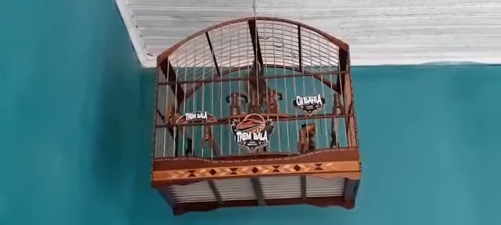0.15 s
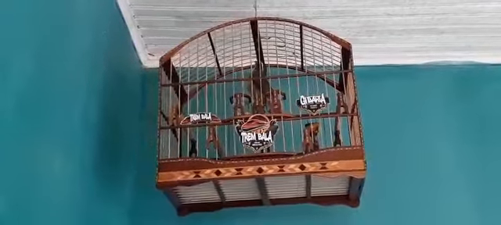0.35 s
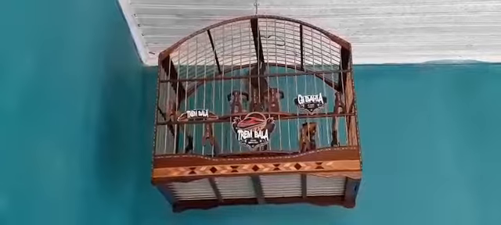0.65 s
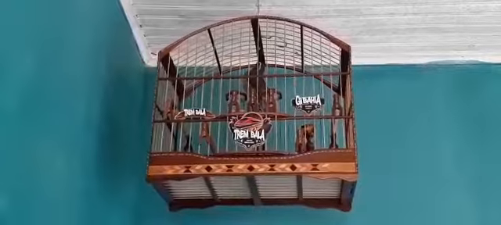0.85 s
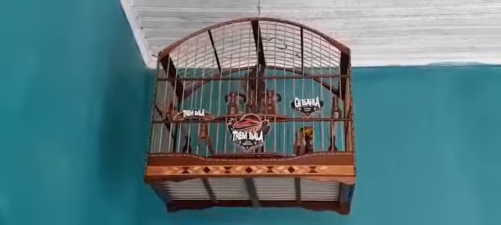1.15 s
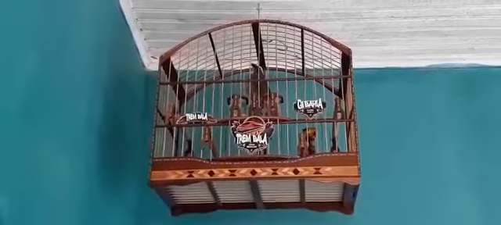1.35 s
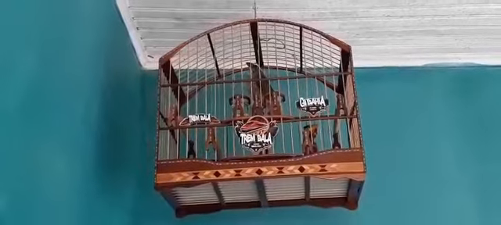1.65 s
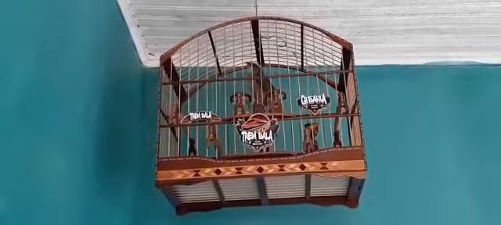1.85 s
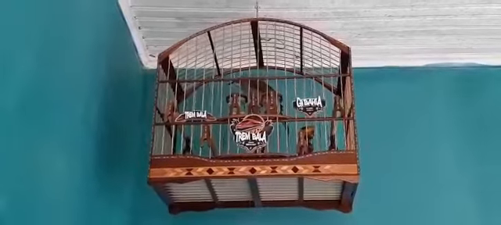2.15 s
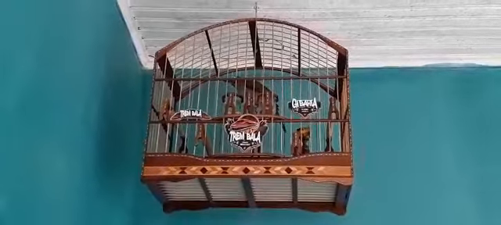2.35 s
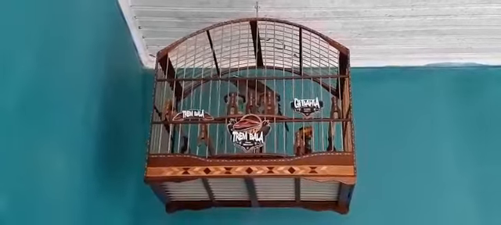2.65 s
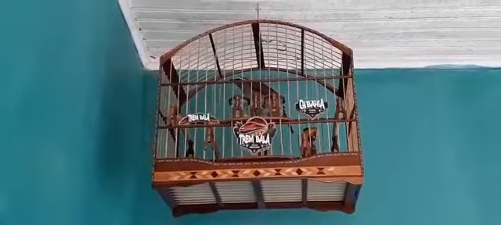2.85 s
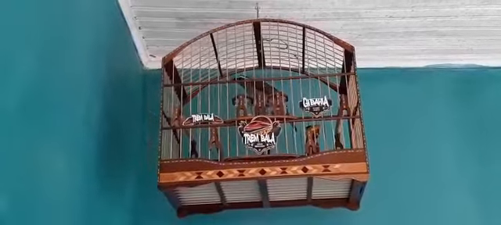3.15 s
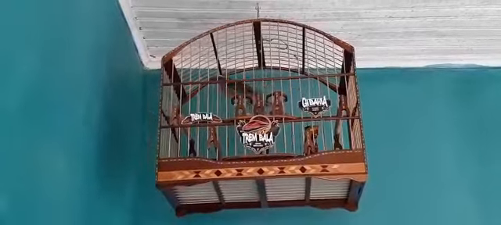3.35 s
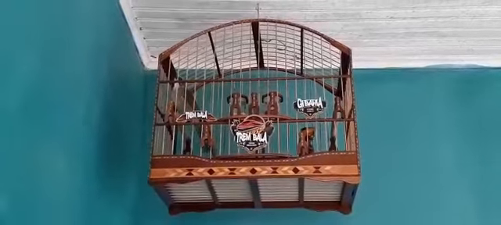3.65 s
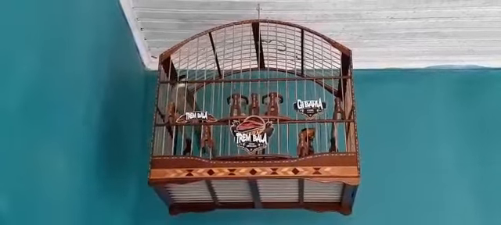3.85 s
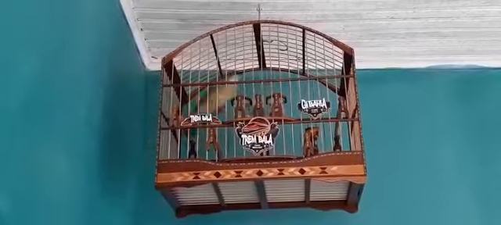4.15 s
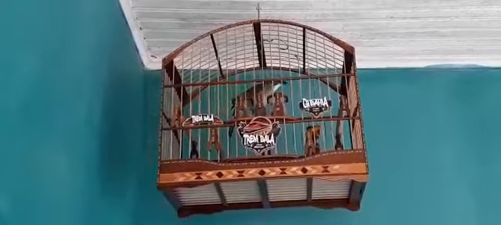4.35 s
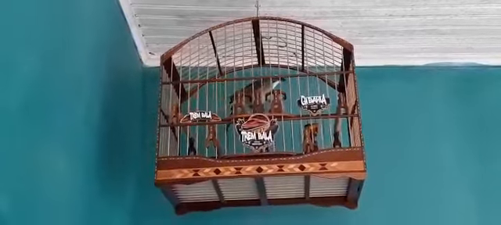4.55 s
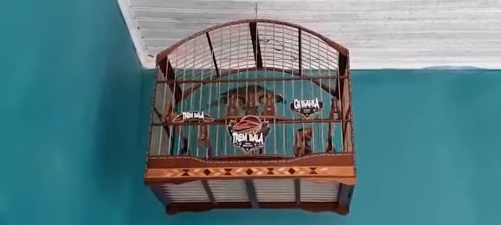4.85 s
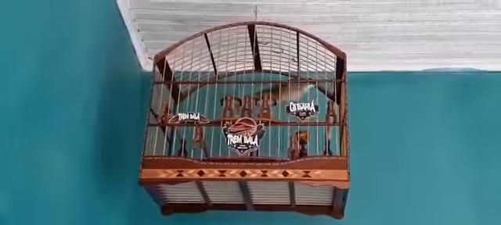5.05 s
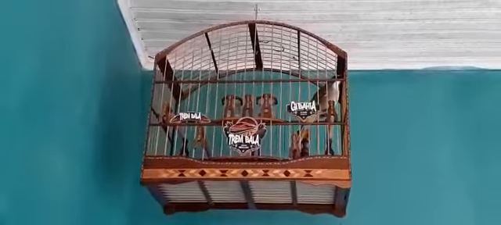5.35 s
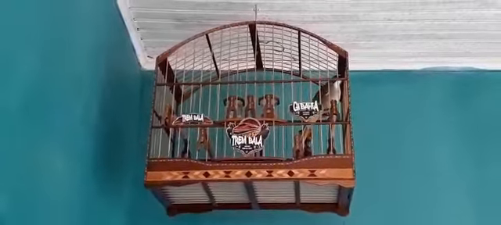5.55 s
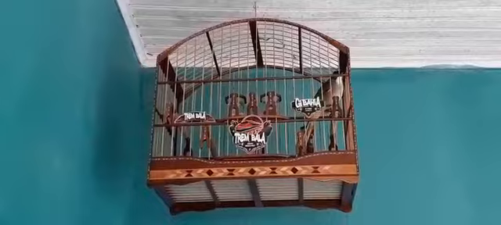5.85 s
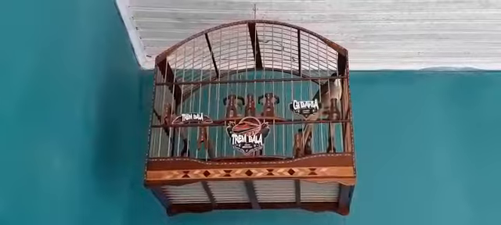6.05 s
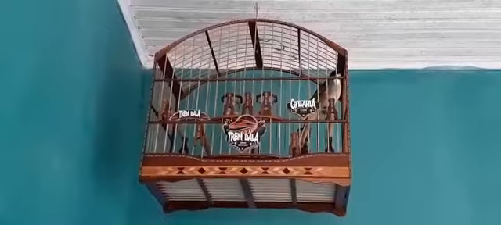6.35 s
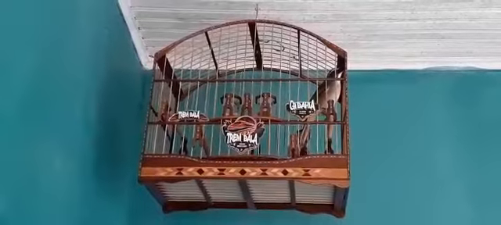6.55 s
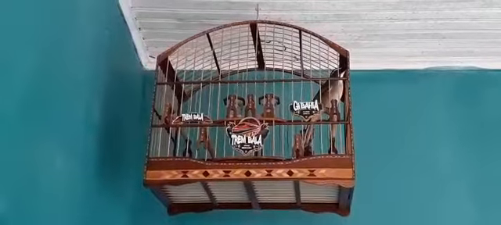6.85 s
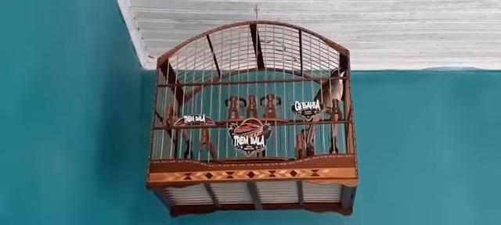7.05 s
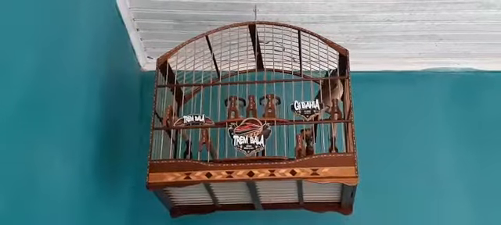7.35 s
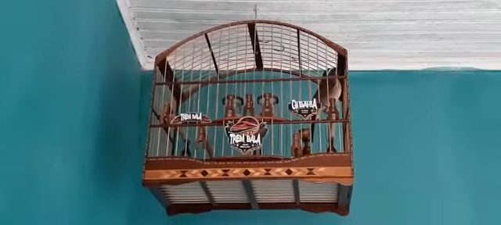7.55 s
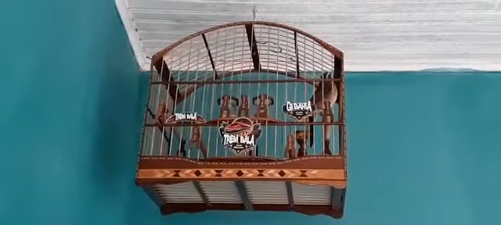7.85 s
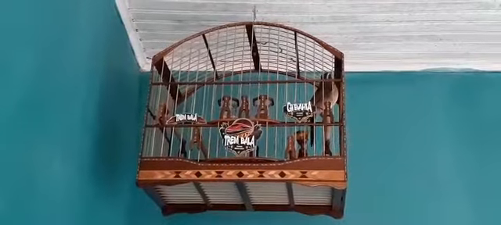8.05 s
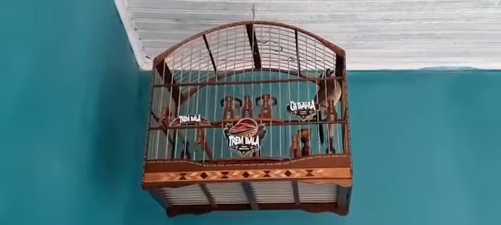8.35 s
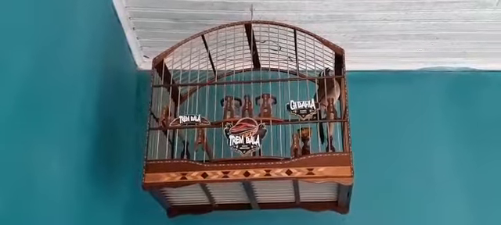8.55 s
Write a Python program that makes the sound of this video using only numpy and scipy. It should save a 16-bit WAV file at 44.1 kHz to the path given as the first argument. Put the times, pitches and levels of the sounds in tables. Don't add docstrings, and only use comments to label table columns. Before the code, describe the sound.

Stereo pickup close to a caged songbird indoors, with a bright echoing tail. Its pure whistled phrase fills the first second; afterwards faint chirps, squeaks, dove coos and vehicle rumble drift in from outside, with a distant buzzy call and dry perch ticks. Around five seconds another bird replies from farther away, blurred by reflections. A very faint horn follows, then the near bird resumes with a buzz and whistles.

```python
import sys
import numpy as np
from scipy import signal
from scipy.io import wavfile
from scipy.ndimage import uniform_filter1d, minimum_filter1d

SR = 44100
rng = np.random.default_rng(int(sys.argv[2]) if len(sys.argv) > 2 else 0)


def gain_from_decibels(decibels):
    exponent = np.asarray(decibels, float) / 20
    return 10 ** exponent


def bounce(signal):
    frames = np.transpose(np.atleast_2d(signal))
    limited = np.clip(frames, -1, 1)
    pcm = np.round(limited * 32767).astype(np.int16)
    wavfile.write(sys.argv[1], SR, pcm)


N = 383669
BEFORE = SR // 4

# (frequency [Hz], density [dB/Hz])
STILL = [(32, -40), (46, -12), (62, -1.5), (93, -5), (130, -8), (200, -14.5), (360, -12), (700, -20.5),
         (1000, -30), (2500, -39), (6000, -33), (8000, -53.5), (12000, -52.5), (16000, -55.5)]
# (frequency [Hz], density [dB/Hz])
ROAD = [(32, -38.5), (48, -12), (86, 1), (208, -18.5), (251, -8.5), (500, -14.5), (977, -15.5),
        (1410, -15.5), (2910, -25.5), (4500, -21.5), (8000, -40), (16000, -57)]
# (frequency [Hz], level [dB])
CHORUS = [(2800, -16), (3600, -2.5), (4500, -0.8), (5600, 0), (6400, -8.5), (7500, -18.5), (10000, -29),
          (13000, -27.5), (16000, -29.5)]
# (frequency [Hz], width [Hz], level [dB])
HUM = [
    (56, 36, -16),
    (89, 56, 1),
]
# (closest [s], half passing time [s], level [dB])
PASSES = [
    (.3, .5, -64),
    (1.8, 0.44, -69.5),
    (2.95, .4, -52),
    (3.55, .4, -52.5),
    (4.4, 0.911, -53),
    (6.4, 0.31, -62.5),
    (8., 0.34, -68),
]
# (centre [s], half length [s], level [dB])
BOUTS = [
    (.3, 0.29, -58.5),
    (1.196, 0.2, -51),
    (2.002, 0.8, -52.5),
    (2.848, 0.5, -47.5),
    (3.502, 0.17, -53),
    (4.017, 0.11, -51),
    (5.252, 0.23, -50),
    (6.18, 0.39, -50),
    (7.426, 0.1, -54.5),
    (8.201, 0.23, -59.5),
]
# (centre [s], half length [s], level [dB])
THROBS = [
    (0.945, .2, -55),
    (2.314, 0.28, -50),
    (2.923, .15, -46.5),
    (3.2, 0.038, -39.5),
    (3.791, 0.065, -41),
    (4.048, 0.055, -46),
    (4.465, 0.2, -44.5),
    (5.302, 0.55, -45.5),
    (6.702, 0.32, -47),
    (7.952, 0.44, -48),
]
STILL_DB, FAR_ROAD_DB, FAR_FLOCK_DB, IDLE_DB = -55, -72.5, -73, -59.5
# (frequency [Hz], correlation [-])
SAME = [(60, 1), (130, .93), (250, .9), (500, 0.51), (1500, 0.58), (4000, 0.28), (10000, 0.4)]
# (frequency [Hz], left minus right [dB])
LEAN = [(60, 7), (130, 9), (290, 2), (620, 5), (1400, 1), (3000, -0.5), (6000, 0.5), (12000, 0.5)]
# (frequency [Hz], phase [rad])
LEAD = [(40, 0.33), (130, 0.89), (300, -0.75), (600, -1.4), (1200, -0.15)]
PORT_LAG_S = 18 / SR

# (time [s], length [s], centre [Hz], level [dB])
CHIRPS = [(0.473, 0.071, 5200, -62), (1.385, 0.039, 3325, -54), (1.646, 0.073, 5199, -48.5),
          (1.854, 0.1, 4952, -52.5), (1.998, 0.0955, 5615, -53), (2.365, 0.17, 5700, -50),
          (2.446, 0.0932, 4900, -53), (3.411, 0.233, 5250, -49), (3.694, 0.0694, 4771, -51),
          (3.948, 0.135, 5132, -49), (4.394, .064, 4537, -54), (5.22, 0.1868, 5347, -48.5),
          (5.97, 0.108, 5684, -45.5), (6.537, 0.06, 3500, -52.5), (6.559, .1, 5210, -56.5),
          (7.1, 0.11, 4410, -63.5), (7.773, 0.075, 3820, -58.5)]
# (time [s], length [s], centre [Hz], level [dB])
SQUEAKS = [
    (0.956, 0.123, 4200, -70.5),
    (1.341, 0.155, 4210, -56.5),
    (3.585, 0.132, 7600, -47.5),
    (5.971, 0.0986, 3800, -41.5),
    (6.618, 0.116, 3100, -61.5),
    (6.95, 0.115, 7070, -57.5),
    (7.351, 0.3, 4170, -65),
    (8.095, .2, 4000, -65.5),
    (8.401, 0.16, 3900, -64),
]
# (time [s], length [s], pitch [Hz], level [dB])
PEEPS = [(1.108, 0.1827, 5900, -60.5), (1.552, 0.048, 6094, -49.5), (1.826, 0.0407, 6180, -52),
         (2.129, 0.18, 8135, -61), (2.363, 0.056, 6388, -54.5), (2.801, 0.0584, 5120, -59),
         (3.696, 0.04, 5870, -53), (3.92, 0.0592, 6164, -48), (4.322, 0.049, 8237, -54),
         (5.255, 0.089, 6050, -52.5), (4.325, 0.049, 8820, -60), (4.59, 0.084, 5893, -50.5),
         (4.934, 0.057, 5882, -50), (5.798, 0.056, 8194, -52.5), (7.343, .17, 4940, -69),
         (6.599, .09, 4200, -55.5)]
# (time [s], length [s], start [Hz], end [Hz], level [dB])
GLIDES = [
    (4.457, 0.062, 5539, 5830, -45.5),
    (4.551, 0.0587, 4440, 3937, -43.5),
    (4.578, 0.044, 3919, 3109, -48),
    (4.625, 0.165, 3262, 2850, -54.5),
    (5.212, 0.07, 4240, 6354, -48),
    (5.968, 0.04, 4400, 6586, -47.5),
]
# (time [s], length [s], start [Hz], end [Hz], level [dB])
DIPS = [
    (0, 0.06, 6680, 5560, -50.5),
    (0.067, 0.103, 5615, 5170, -51.5),
    (3.08, 0.0776, 5983, 5935, -52.5),
    (6.098, 0.086, 6847, 5774, -49.5),
    (6.176, .07, 5820, 5262, -44),
    (6.239, 0.1384, 5330, 6059, -48),
]
# (time [s], length [s], pitch [Hz], level [dB], waver [Hz])
COOS = [
    (0.271, 0.13, 1017, -64, 28.8),
    (1.264, 0.1564, 984, -59, 35),
    (1.45, 0.254, 492, -59.5, 31),
    (2.753, 0.116, 964, -61.5, 30.6),
    (3.583, 0.1, 274.7, -61, 8.1),
    (4.218, 0.243, 257, -59.5, 9.5),
    (4.45, 0.32, 273, -55.5, 13.9),
    (6.122, 0.097, 720, -63, 20),
    (7.972, 0.275, 664, -67, 15.8),
    (7.45, 0.067, 534, -62.5, 25.6),
]
# (time [s], length [s], pitch [Hz], level [dB], lowest multiple [-], highest multiple [-])
HORN = [
    (6.78, .3, 436, -69, 6, 8),
    (7.32, .14, 586, -76, 3, 4),
]
HORN_DB = 0.5
# (time [s], length [s], from [Hz], to [Hz], level [dB])
ANSWERS = [
    (2.875, .24, 3260, 2292, -53.5),
    (3.366, .2, 2803, 2400, -43),
    (3.805, .24, 2220, 1957, -46.5),
    (4.18, .19, 2976, 2034, -43.5),
]
# (share of length [-], share of glide [-], level [dB], overtones [dB])
ANSWER = [(0, 0.052, -9.5, -40), (.25, .12, -3.5, -39), (.5, .42, -3, -34.5), (.8, .82, -2.5, -36.5),
          (1, 0.988, -2.5, -40)]
GLIDE_WARBLE, DIP_WARBLE, PEEP_WARBLE, CHIRP_WARBLE = .035, .0091, .012, .083
SQUEAK_WARBLE_HZ, PEEP_SAG = 200, .008

# (time [s], peak [dB])
TICKS = [
    (3.559, -44),
    (4.2253, -34.5),
]

# (time [s], length [s], from [Hz], to [Hz], level [dB])
OTHER_LEAD_IN = [
    (5.045, 0.088, 2355, 2203, -30.5),
]
OTHER_BUZZES = [
    (5.072, .245, 2890, 1967, -24),
]
OTHER_FALLS = [
    (5.466, .235, 3684, 2025, -20.5),
    (5.797, .23, 3677, 2005, -21.5),
]
OTHER_RISES = [
    (6.122, .478, 1209, 2365, -32),
]
# (share of length [-], share of glide [-], level [dB], overtones [dB])
LEAD_IN = [(0, 0.107, -21.5, -50), (.45, 0.95, -13, -50), (1, 0.085, 3, -42.5)]
FAR_BUZZ = [(0, 0, -30, -41.5), (.16, .14, -3.5, -37.5), (.33, .4, 0, -32.5), (.7, .74, -5, -31.5),
            (.85, .88, -9.5, -33.5), (1, 0.94, -12, -38.5)]
FAR_FALL = [(0, 0.015, -13, -34), (.15, .18, 1, -28), (.35, .45, -2.5, -23), (.68, .76, -3.5, -32.5),
            (1, 0.991, -16.5, -28)]
FAR_RISE_PATH = [(0, 0), (.1, .17), (.26, .36), (.47, .57), (.68, .78), (.9, .96), (1, 1)]
# (share of length [-], level [dB], overtones [dB])
FAR_RISE = [(0, -28, -36.5), (.12, -20, -33.5), (.26, -10, -33.5), (.47, -3.5, -25.5), (.66, -0.5, -28.5),
            (.93, -8.5, -30.5), (1.001, -24, -24.5)]
DULL_DB = -4

# (time [s], length [s], from [Hz], to [Hz], level [dB])
NEAR_HIGH = [
    (-.2, .2, 2480, 2855, -20),
    (8.216, .2, 2480, 2855, -17.5),
]
NEAR_LOW = [
    (.14, .155, 1420, 2090, -23.5),
    (8.544, .155, 1420, 2090, -22),
]
NEAR_FALLS = [
    (.43, .215, 3449, 2131, -17.5),
]
NEAR_RISES = [
    (.74, .42, 1180, 2525, -25),
]
NEAR_BUZZES = [
    (7.814, .217, 2470, 1942, -22),
]
# (share of length [-], share of glide [-], level [dB], overtones [dB])
BUZZ = [(0, 0.026, -45.5, -47.5), (.17, 0.16, -5, -34.5), (0.299, .3, 1, -32), (.5, .52, -1.5, -31),
        (.7, .74, -2.5, -32.5), (1, 0.93, -7, -39)]
FALL = [(0, 0, -22, -15.5), (.2, .22, -1.5, -36.5), (.45, .53, 0, -36.5), (.6, .69, -2, -32),
        (0.7, .8, -6, -27), (.84, .91, -6.5, -24.5), (1, 1.03, -18, -29.5)]
HIGH_PATH = [(0, 0), (.08, .65), (.19, .9), (.33, .95), (.57, 1), (.75, .82), (1, .42)]
LOW_PATH = [(0, 0), (.155, .76), (.22, .88), (.35, 1), (.53, .95), (.7, .88), (1, .62)]
RISE_PATH = [(0, 0), (.11, .165), (.235, .29), (.41, .415), (.55, .52), (.62, .61), (.78, .78), (.92, .98),
             (1, 1)]
# (share of length [-], level [dB], overtones [dB])
HIGH_ARCH = [(0, -37.5, -29), (0.14, -13, -39.5), (0.3, 0.5, -42), (.5, 0, -36), (0.65, 1, -34.5),
             (.8, -3.5, -35), (0.92, -0.5, -35), (1, -10.5, -38)]
LOW_ARCH = [(0, -41.5, -61.5), (.2, -12.5, -35), (.34, -4.5, -25), (.6, -0.5, -30), (.86, -6.5, -34.5),
            (1, -5.5, -36)]
RISE = [(0, -36, -44), (.12, -22, -32), (.24, -17.5, -30), (.43, -7.5, -35), (.56, -9.5, -27),
        (.66, -4, -25), (.93, -1.5, -33), (1, -6, -36)]

MULTIPLES_DB = [-1, -7.5, -2.5, -1.5, -2.5, -2, -8, -8, -18]
# (frequency [Hz], gain [dB])
THROAT = [(3000, -22), (5000, -12), (7000, -1.5), (9000, -2), (11000, 1), (13000, -4), (16000, -8)]
FLICKER_DB = 4
# (frequency [Hz], T60 [s])
ROOM = [(200, 0.53), (1500, 0.75), (2500, 0.73), (4000, 0.66), (7000, 0.6), (11000, 0.5), (16000, 0.15)]
# (frequency [Hz], gain [dB])
WALLS = [(3000, -0.02), (6000, -4), (10000, -3), (16000, -4.5)]
# (frequency [Hz], left minus right [dB])
PORTS = [(2000, -2.16), (4000, 1), (8000, 5.5), (12000, -0.5)]


def read(points, hz):
    f, value = np.transpose(points)
    return np.interp(np.log(hz + 1), np.log(f + 1), value)


def evened(x):
    return x / np.sqrt(np.mean(x ** 2) + 1e-20)


def wander(count, seconds):
    size = max(int(seconds * SR), 2)
    return evened(uniform_filter1d(uniform_filter1d(rng.standard_normal(count), size), size))


def silence():
    return np.zeros(N + 2 * BEFORE)


def add(mix, s, sound):
    part = mix[round(s * SR) + BEFORE:][:len(sound)]
    part += sound[:len(part)]


def room(x, direct_db, wet_db, lag, pan_db, slow):
    taps = np.zeros((2, SR + SR // 4))
    at = np.arange(200, len(taps[0]) - 12, 12)
    at = at + rng.integers(0, 12, (2, len(at)))
    np.put_along_axis(taps, at, rng.choice([-1., 1.], at.shape), 1)
    hz, t, z = signal.stft(taps, SR, nperseg=256)
    z = z * gain_from_decibels(read(WALLS, hz))[:, None]
    t60_s = slow * read(ROOM, hz)[:, None]
    tail = signal.istft(z * gain_from_decibels(-60 * t / t60_s), SR, nperseg=256)[1]
    tail *= gain_from_decibels(wet_db) / np.linalg.norm(tail[0]) * .5 ** .5 * 2
    tail[0, 40 + lag] += gain_from_decibels(direct_db + pan_db / 2)
    tail[1, 40] += gain_from_decibels(direct_db - pan_db / 2)
    return signal.fftconvolve(x[None], tail, axes=1)[:, BEFORE + 40:BEFORE + 40 + N]


def warble(length, hz, end_hz, width_hz, db, quick, octave_db=-24, swell_db=0):
    count = int(length * SR)
    pitch_hz = np.geomspace(hz, end_hz, count) + width_hz * wander(count, quick)
    turn = 2 * np.pi * np.cumsum(pitch_hz) / SR
    swell = gain_from_decibels(swell_db * np.linspace(1, 0, count) ** 3)
    soft = signal.windows.tukey(count, .25) * swell
    return np.sqrt(2) * gain_from_decibels(db) * (np.sin(turn) + gain_from_decibels(octave_db) * np.sin(2 * turn)) * soft


def whistle(rows, buzz=0., buzz_hz=150., swing=0., octave_db=0., third_db=0., tilt_db=0.):
    s, *columns = np.transpose(rows)
    t = np.arange(s[0], s[-1], 1 / SR)
    hz, level_db, over_db = (uniform_filter1d(np.interp(t, s, c), size=500, mode="nearest") for c in columns)
    flutter = 2 * np.pi * buzz_hz * np.cumsum(1 + .04 * wander(len(t), 0.01105)) / SR
    pitch_hz = hz * (1 + swing * np.sin(flutter) + 0.0027 * wander(len(t), 0.001))
    turn = 2 * np.pi * np.cumsum(pitch_hz) / SR
    multiples_db = np.add(MULTIPLES_DB, tilt_db * np.arange(len(MULTIPLES_DB)))
    multiples_db[:2] += octave_db, third_db
    overtones = 0
    for k, db in enumerate(multiples_db, 2):
        strength = gain_from_decibels(db + read(THROAT, k * hz) + FLICKER_DB * wander(len(t), .012))
        overtones = overtones + strength * (k * hz < 17000) * np.sin(k * turn)
    chop = 1 - np.clip(buzz, 0, 1) * np.cos(flutter)
    tone = (np.sin(turn) + gain_from_decibels(over_db) * overtones) * chop
    edge = np.minimum(np.minimum(t - t[0], t[-1] - t) / .006, 1)
    return s[0], np.sqrt(2) * gain_from_decibels(level_db) * tone * edge


def along(path, effort):
    when = np.linspace(0, 1, num=41)
    at, level_db, over_db = np.transpose(effort)
    glide = np.interp(when, *np.transpose(path))
    return np.transpose([when, glide, np.interp(when, at, level_db), np.interp(when, at, over_db)])


def sing(mix, shape, notes, dull_db=0, **voice):
    when, glide, shape_db, over_db = np.transpose(shape)
    for s, length, hz, end_hz, db in notes:
        pitch_hz = hz + glide * (end_hz - hz)
        rows = np.transpose([s + when * length, pitch_hz, db + shape_db, over_db + dull_db])
        add(mix, *whistle(rows, **voice))


def swells(t, rows, rest_db):
    return gain_from_decibels(2 * rest_db) + sum(gain_from_decibels(2 * db) / (1 + ((t - s) / half) ** 2) ** 2 for s, half, db in rows)


def air():
    frames, hz = N // 512 + 5, np.fft.rfftfreq(2048, 1 / SR)
    t = np.arange(frames) * 512 / SR
    hum = np.sqrt(sum(gain_from_decibels(2 * db) / (1 + ((hz - f) / w * 2) ** 2) ** 2 for f, w, db in HUM))
    layers = [  # spectrum, power over time, trim dB
        (gain_from_decibels(read(STILL, hz)), swells(t, [], STILL_DB) + 0 * t, -6.0),
        (gain_from_decibels(read(ROAD, hz)), swells(t, PASSES, FAR_ROAD_DB), 3.0),
        (gain_from_decibels(read(CHORUS, hz)), swells(t, BOUTS, FAR_FLOCK_DB), -6.0),
        (hum, swells(t, THROBS, IDLE_DB), -5.0)]
    power = sum(np.outer(evened(shape) ** 2, level * gain_from_decibels(2 * db)) for shape, level, db in layers)
    a, b, c, d, patches = rng.standard_normal((frames, len(hz), 5)).T
    patches = evened(uniform_filter1d(uniform_filter1d(patches, size=25, axis=0), size=8, axis=1))
    patch_db = (1.9 + 1.3 * (hz > 3300))[:, None] * patches
    same = np.clip(read(SAME, hz), -1, 1)[:, None]
    phase = (read(LEAD, hz) + 2 * np.pi * hz * PORT_LAG_S)[:, None]
    left = a + 1j * b
    right = (same * left + np.sqrt(1 - same ** 2) * (c + 1j * d)) * np.exp(1j * phase)
    lean = gain_from_decibels(read(LEAN, hz) / 2)[:, None]
    z = np.array([left * lean, right / lean]) * np.sqrt(power) * gain_from_decibels(patch_db)
    return 0.0535 * signal.istft(z, nperseg=2048, noverlap=1536)[1][:, :N]


def outdoors():
    mix, early_s = silence(), .012
    sing(mix, ANSWER, ANSWERS, buzz=0.34, buzz_hz=131.5, swing=.028)
    for s, length, hz, end_hz, db in GLIDES:
        add(mix, s - early_s, warble(length, hz, end_hz, hz * GLIDE_WARBLE, db, .0015, swell_db=-2.5))
    for s, length, hz, end_hz, db in DIPS:
        add(mix, s - early_s, warble(length, hz, end_hz, hz * DIP_WARBLE, db, .0015))
    for s, length, hz, db in PEEPS:
        start_hz, end_hz = hz * (1 + PEEP_SAG), hz * (1 - PEEP_SAG)
        add(mix, s - early_s, warble(length, start_hz, end_hz, hz * PEEP_WARBLE, db, .0015))
    for s, length, hz, db in CHIRPS:
        add(mix, s, warble(length, hz * 1.03, hz * .97, hz * CHIRP_WARBLE, db, .0012))
    for s, length, hz, db in SQUEAKS:
        add(mix, s, warble(length, hz * 1.03, hz * .97, SQUEAK_WARBLE_HZ, db, .0012))
    for s, length, hz, db, width_hz in COOS:
        add(mix, s, warble(length, hz, hz, width_hz, db, .02, octave_db=-34))
    for s, length, hz, db, low, high in HORN:
        for k in range(int(low), int(high) + 1):
            add(mix, s, warble(length, k * hz, k * hz, 7.1, db + HORN_DB, 0.024, octave_db=-45))
    return room(mix, direct_db=-8.0, wet_db=-1.5, lag=17, pan_db=9.5, slow=1.197)


def perch():
    mix, t = silence(), np.arange(200) / SR
    for s, db in TICKS:
        add(mix, s, gain_from_decibels(db - 60 * t / 0.012) * np.diff(rng.standard_normal(201)) * .4)
    return room(mix, direct_db=-1.5, wet_db=2.93, lag=10, pan_db=-1.5, slow=0.66)


def other_bird():
    mix = silence()
    clear = dict(octave_db=-3.0, third_db=-2, tilt_db=0.44)
    buzzed = dict(buzz=0.63, buzz_hz=119.3, swing=0.039, third_db=4.0, tilt_db=1.0)
    sing(mix, FAR_FALL, OTHER_FALLS, DULL_DB, **clear)
    sing(mix, along(FAR_RISE_PATH, FAR_RISE), OTHER_RISES, DULL_DB, **clear)
    sing(mix, LEAD_IN, OTHER_LEAD_IN, DULL_DB, **buzzed)
    sing(mix, FAR_BUZZ, OTHER_BUZZES, DULL_DB, **buzzed)
    return room(mix, direct_db=-10.5, wet_db=0.0, lag=12, pan_db=7.0, slow=1.254)


def near_bird():
    mix = silence()
    sing(mix, along(HIGH_PATH, HIGH_ARCH), NEAR_HIGH, octave_db=5.5, third_db=-2.5, tilt_db=0.84)
    sing(mix, along(LOW_PATH, LOW_ARCH), NEAR_LOW, octave_db=6, third_db=-3, tilt_db=0.7)
    sing(mix, FALL, NEAR_FALLS, octave_db=4.5, third_db=-6, tilt_db=0.15)
    sing(mix, along(RISE_PATH, RISE), NEAR_RISES, octave_db=7, third_db=4.5, tilt_db=-0.14)
    sing(mix, BUZZ, NEAR_BUZZES, buzz=0.47, buzz_hz=148.6, swing=0.02, octave_db=6, tilt_db=0.96)
    return room(mix, direct_db=3.5, wet_db=0.5, lag=-18, pan_db=9.0, slow=1.04)


def scene():
    return air() + outdoors() + perch() + other_bird() + near_bird()


def drop_hidden(z, hz):
    band_db = 10 * np.log10(uniform_filter1d(abs(z) ** 2, size=12, axis=1).clip(1e-16))
    fall_db = (hz / 1000 * 22)[:, None]
    above_db = np.maximum.accumulate(band_db + fall_db, axis=1) - fall_db - 20.5
    below_db = np.maximum.accumulate((band_db - 3 * fall_db)[:, ::-1], axis=1)[:, ::-1] + 3 * fall_db - 24.5
    hidden_db = np.maximum(above_db, below_db)
    return z * np.clip((band_db - hidden_db) / 2.8 + .5, 0, 1)


def limit(x):
    ceiling = .96
    gain = minimum_filter1d(ceiling / np.maximum(abs(x).max(0), ceiling), size=441)
    return x * uniform_filter1d(gain, size=441)


def roll_off(x):
    return signal.sosfilt(signal.butter(12, 15720, fs=SR, output="sos"), x)


def record(dry):
    hz, _, z = signal.stft(dry, SR, nperseg=2048, noverlap=1024)
    z = z * gain_from_decibels(np.outer([.5, -.5], read(PORTS, hz)))[:, :, None]
    z = z / (1 + (33.0 / hz.clip(1)) ** 6)[:, None]
    heard = signal.istft(drop_hidden(z, hz), SR, nperseg=2048, noverlap=1024)[1][:, :N]
    fade_in_s = .00015
    heard = heard * np.minimum(np.arange(N) / SR / fade_in_s, 1)
    return roll_off(limit(heard))


dry = scene()
out = record(dry)
bounce(out)
```